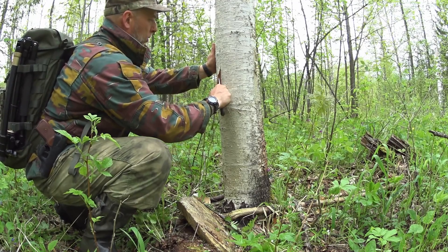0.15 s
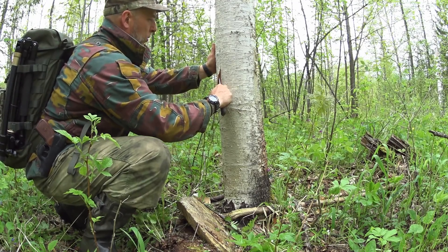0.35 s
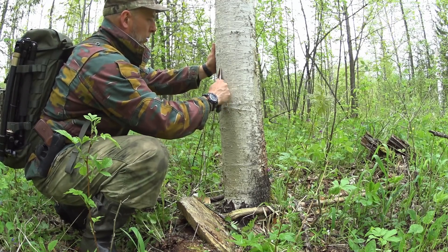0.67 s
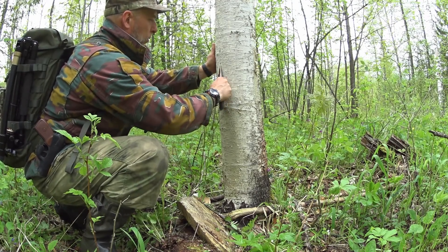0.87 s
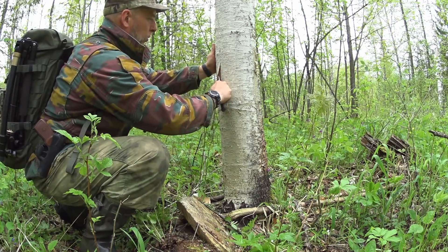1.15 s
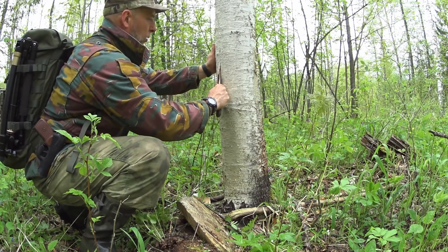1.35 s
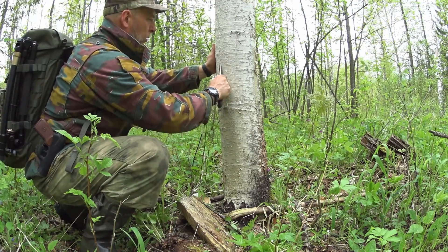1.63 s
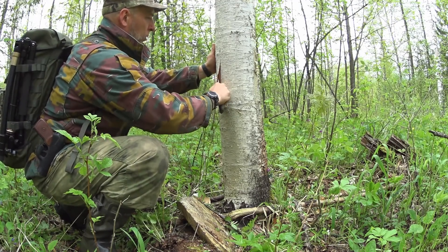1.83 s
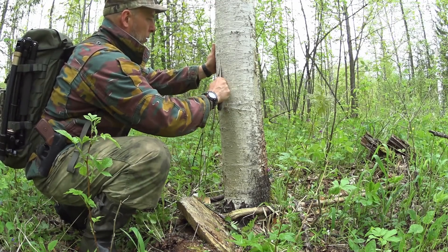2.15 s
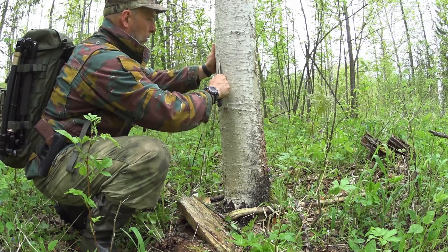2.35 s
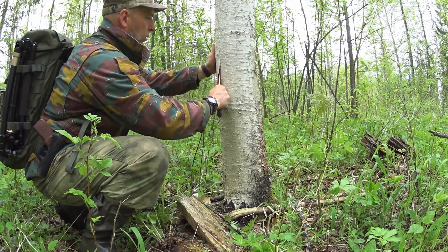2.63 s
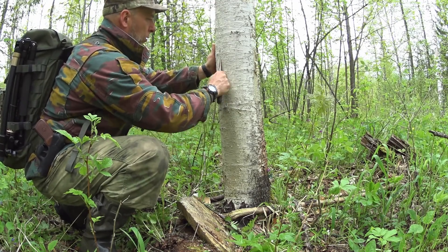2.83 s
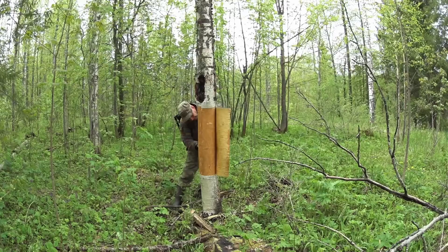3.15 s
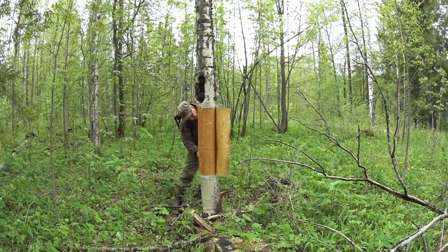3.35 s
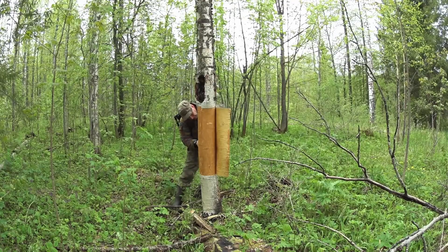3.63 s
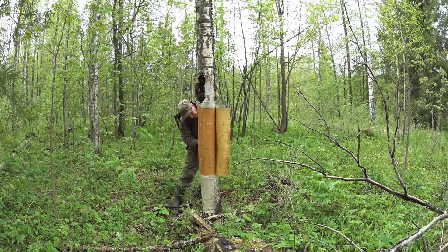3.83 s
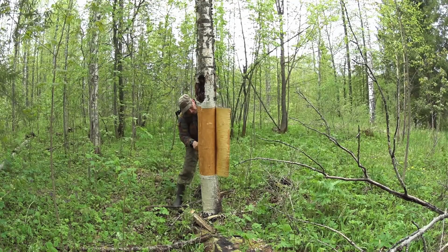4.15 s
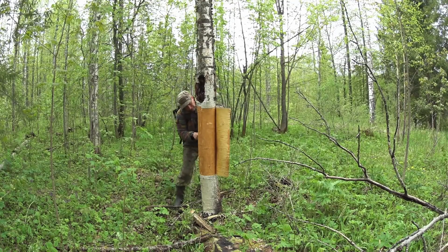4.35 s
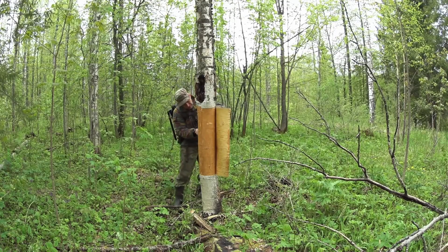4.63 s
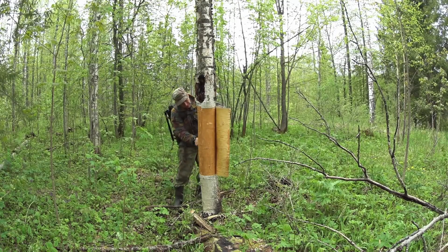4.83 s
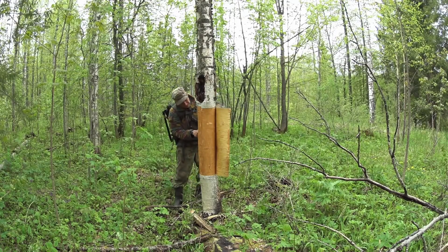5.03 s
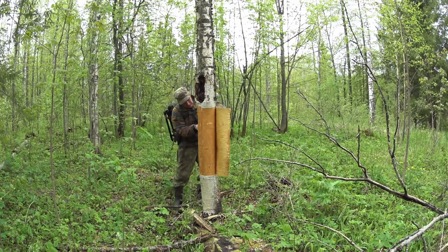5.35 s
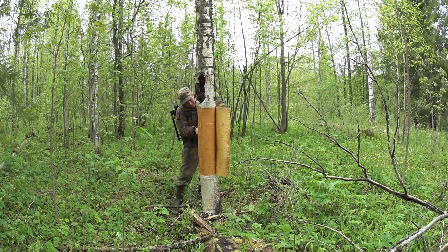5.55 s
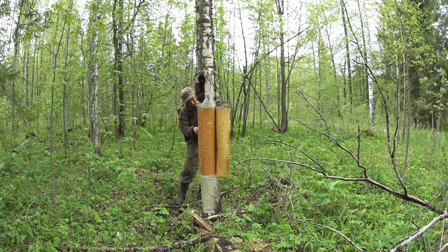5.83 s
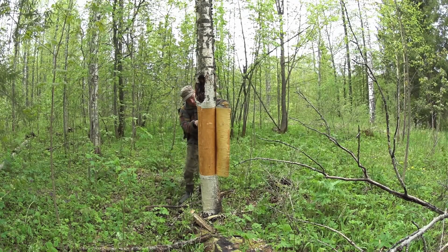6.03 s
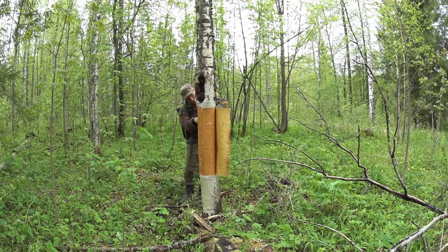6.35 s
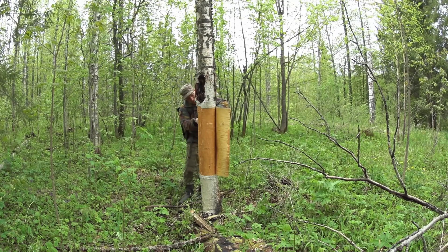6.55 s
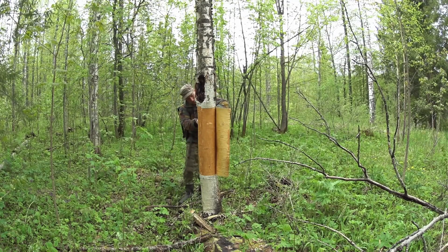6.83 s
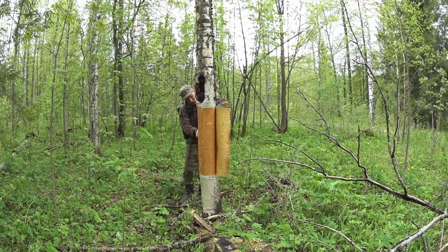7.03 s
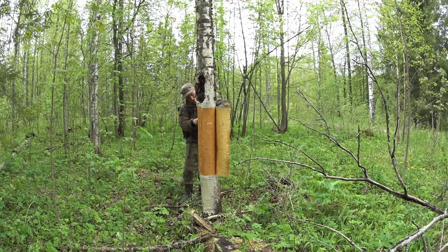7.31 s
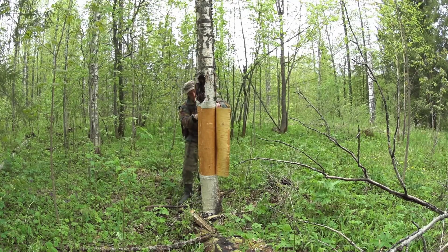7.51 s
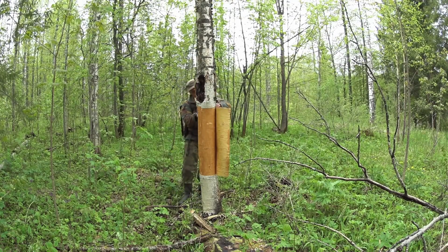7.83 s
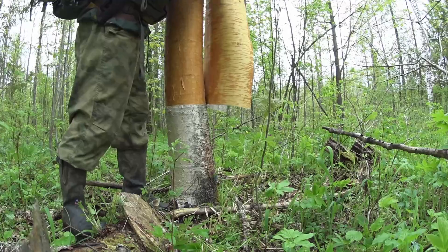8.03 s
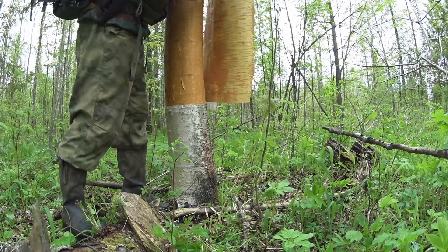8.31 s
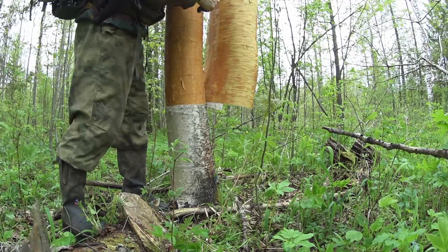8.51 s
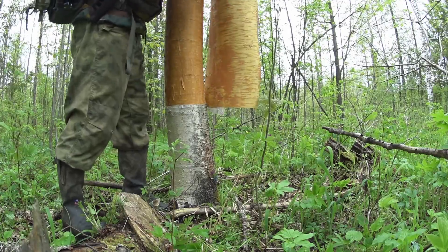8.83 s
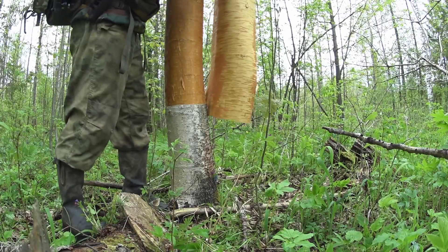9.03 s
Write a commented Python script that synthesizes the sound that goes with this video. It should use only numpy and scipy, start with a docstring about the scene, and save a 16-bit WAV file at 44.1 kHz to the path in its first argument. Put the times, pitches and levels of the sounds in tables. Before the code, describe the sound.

Short gritty cuts and dry snaps in tree bark, heard near then at a distance, end with peeling bark splitting and knocking hollowly outdoors.

```python
"""Cutting birch bark in the woods

A knife is pushed in short strokes through birch bark, first close by, then farther off among the trees.
Each stroke is a dense run of tiny random snaps, coloured by the rasp of the edge and the body of the bark.
At the end the loosened sheet peels, cracks and slaps back: splitting noise over decaying hollow modes.
Behind it: forest air and a distant road of shaped noise, and faint birds of gliding sine tones."""
import sys
import numpy as np
from scipy import signal
from scipy.fft import rfft, irfft, next_fast_len
from scipy.io import wavfile
from scipy.ndimage import uniform_filter1d

SR = 44100
rng = np.random.default_rng(int(sys.argv[2]) if len(sys.argv) > 2 else 0)


def wav_record(signal):
    """Record a signal, one row per channel, as 16-bit PCM in the file named by sys.argv[1]."""
    frames = np.transpose(np.atleast_2d(signal))
    bounded = np.clip(frames, -1, 1)
    # unit amplitude maps onto the largest positive 16-bit level
    quanta = np.round(bounded * 32767).astype(np.int16)
    wavfile.write(sys.argv[1], SR, quanta)


N = 404397
TIME = np.arange(N) / SR
FAR_FROM, SHEET_FROM = 3.227, 8.0  # s, start of the farther standpoint and of the one at the sheet
# Body of the bark close by. Each row: frequency in Hz, relative level in dB per Hz.
BODY_NEAR = [(150, -18), (350, -11.5), (700, -5), (1000, 2.5), (1350, 5), (1800, 4), (2400, 2.5), (3200, 0),
             (6000, -11.5)]


def pushes():
    """Rows of every push of the blade: the strokes, and the short bites where it breaks through."""
    # Passes along the cut. Each row: middle in seconds, length in seconds, relative level of the rasp in dB,
    # bark body in dB against the rasp.
    strokes = [(0.232, 0.044, -55, -25), (0.47, .14, -53.5, -19), (0.544, 0.0087, -46, -3.5),
               (0.577, 0.017, -51, -0.5), (0.72, 0.13, -48, -12.5), (1.036, .02, -47.5, 0.5),
               (1.088, 0.074, -39.5, -10), (1.378, 0.13, -48, -11), (1.558, .08, -44.5, -11.5),
               (1.801, 0.083, -33, -4), (2.055, 0.014, -42, -2), (2.1, 0.09, -47, -4),
               (2.216, 0.038, -46.5, -7.5), (2.263, 0.057, -42.5, -12), (2.441, 0.019, -40, -4),
               (2.508, 0.089, -33.5, -2.5), (2.674, 0.12, -44.5, -13), (2.897, 0.093, -44, -9.5),
               (3.137, 0.082, -33.5, -3.5), (3.418, 0.064, -37.5, -5), (3.952, 0.099, -40, -9.5),
               (4.837, 0.086, -36.5, -6.5), (5.128, 0.12, -50.5, 0), (5.672, 0.094, -36.5, -9),
               (6.615, 0.033, -53.5, -13), (7.025, 0.11, -40.5, -7), (7.342, 0.04, -53.5, 2),
               (7.415, 0.13, -56, -2.5)]
    # The blade breaks through in a hard stroke. Each row: middle in seconds, relative level of the rasp in dB,
    # bark body in dB against the rasp.
    bites = [(1.078, -29.5, -6.5), (1.394, -41.5, -4), (1.78, -23, -7.5), (2.112, -32, -3),
             (2.483, -24, -6.5), (2.693, -33, -3), (3.122, -20, -5), (3.437, -39.5, 7), (3.971, -36, 0.5),
             (4.862, -35, 3.5), (5.68, -32, 1), (7.056, -42.5, -2)]
    bite_s = 0.025
    return strokes + [(s, bite_s, db, body_db) for s, db, body_db in bites]


def close_strokes():
    """The knife close to the microphone: snaps of very uneven size."""
    # Rasp of the edge close by. Each row: frequency in Hz, relative level in dB per Hz.
    rasp_near = [(1200, -19.5), (2800, -26.5), (3250, -1.5), (3700, 5), (4700, 0.5), (5700, 0.5),
                 (7500, -4.5), (9500, -7), (11000, -10)]
    rows = [row for row in pushes() if row[0] < FAR_FROM]
    return scrape(rows, rasp_near, BODY_NEAR, per_s=8000, spread_db=4.5, judder_db=2.5,
                  ripple_db=1.8, travel_s=0.019)


def far_strokes():
    """The knife farther off among the trees: snaps of nearly even size."""
    # Rasp of the edge at a distance. Each row: frequency in Hz, relative level in dB per Hz.
    rasp_far = [(1200, 1.5), (2400, -13.5), (3300, 0), (4300, -3), (6400, -2.5), (8500, -6), (11000, -9.5)]
    # Body of the bark at a distance. Each row: frequency in Hz, relative level in dB per Hz.
    body_far = [(120, -37), (200, -30), (300, -1.5), (500, -16), (750, 4), (1000, 7), (1300, 2.5),
                (1650, -7), (2300, -1.5), (4000, -24)]
    rows = [row for row in pushes() if row[0] >= FAR_FROM]
    return scrape(rows, rasp_far, body_far, per_s=8000, spread_db=-0.5, judder_db=3.0,
                  ripple_db=2.6, travel_s=0.021)


def peeling():
    """The sheet peels from the wood in bursts of parting fibres."""
    # Each row: middle in seconds, length in seconds, relative level of the rasp in dB,
    # bark body in dB against the rasp.
    peels = [(8.076, 0.074, -43, 1), (8.142, 0.032, -51.5, 13.5), (8.57, 0.082, -66, 8.5),
             (8.92, 0.045, -55.5, 10.5), (9.04, 0.054, -46, 6.5), (9.1, 0.015, -33, -3.5),
             (9.144, 0.054, -28, -2.5)]
    # Rasp of the parting sheet. Each row: frequency in Hz, relative level in dB per Hz.
    rasp_sheet = [(1200, 14), (3000, -9), (4200, -3), (5200, 12.5), (8000, 11.5), (11000, 8)]
    # Body of the sheet. Each row: frequency in Hz, relative level in dB per Hz.
    body_sheet = [(70, -2), (200, -5.5), (450, 2), (700, -2), (1100, -0.5), (1700, -6.5), (2700, -4.5),
                  (5000, -20)]
    return scrape(peels, rasp_sheet, body_sheet, per_s=9000, spread_db=4.5, judder_db=2.5,
                  ripple_db=3.2, travel_s=0.022)


def scrape(rows, rasp, body, per_s, spread_db, judder_db, ripple_db, travel_s):
    """Fibres part under a swelling push that sticks and slips; the ring of the bark changes as the cut travels."""
    out = np.zeros(N)
    t = np.arange(-SR // 4, SR // 4) / SR
    for s, length, db, body_db in rows:
        judder = gain_of(judder_db * wander(len(t), 257.7))
        parting = swell(t, length) * fibres(len(t), per_s, spread_db) * judder
        # three spots take turns; the random part blends each into the next
        spot = np.floor(t / travel_s + rng.random(len(t))) % 3
        for k in range(3):
            # the rasp comes straight from the edge, the body of the bark answers half a millisecond later
            answer = np.roll(ring(body, ripple_db / 2), SR // 2000)
            bark = ring(rasp, ripple_db) + gain_of(body_db) * answer
            sound = gain_of(db) * colour(parting * (spot == k), bark)
            add(out, s + t[0], sound[t + s >= 0])
    return out


def swell(t, length):
    """A push around t = 0: it builds up exponentially, holds and lets go."""
    half_hold = 0.63 * length / 2
    attack_s, release_s = 0.28 * length, 0.15 * length
    build_up = np.minimum(t + half_hold, 0) / attack_s
    let_go = np.maximum(t - half_hold, 0) / release_s
    return np.exp(build_up - let_go)


def fibres(count, per_s, spread_db):
    """A random run of tiny snaps, rms 1; the larger spread_db, the more uneven their size."""
    chance, size, sign = rng.random((3, count))
    strength = gain_of(-spread_db * np.log(size + .02))
    return evened((chance < per_s / SR) * strength * np.sign(sign - .5))


def snaps():
    """Single flakes break with a bright tick, a brief splintering and a dull knock of the bark."""
    # The loudest flakes. Each row: start in seconds, peak in dB, dull knock in dB against the bright tick.
    flakes = [(1.3988, -24, 5), (1.95, -37.5, 25), (2.0866, -13.5, -6.5), (2.0964, -19.5, -8),
              (2.649, -25.5, 23), (2.685, -22.5, 12), (3.1095, -22, -14), (3.394, -19, -10),
              (4.223, -29.5, -16), (4.401, -38, -3), (4.593, -27, -3), (4.855, -26, 10), (5.14, -29.5, 20),
              (8.863, -34, -25), (9.109, -15.5, -12), (9.134, -6, -46), (9.142, -12.5, -37),
              (9.1522, -11, -15)]
    # Tick of a breaking flake. Each row: frequency in Hz, relative level in dB per Hz.
    tick_colour = [(250, 15), (1200, -1.5), (3000, -1.5), (5200, 6.5), (8000, 0), (11000, 5.5)]
    out = np.zeros(N)
    t = np.arange(1500) / SR
    for s, db, knock_db in flakes + stray_flakes():
        splinter_s = 0.0028 * 2 ** (knock_db / 39)  # duller flakes splinter longer
        burst = rng.standard_normal(len(t)) * np.exp(-t / splinter_s) * (1 - np.exp(-t / 0.0001))
        sound = colour(burst, ring(tick_colour, 1.2) + gain_of(knock_db) * ring(BODY_NEAR, 2.0))
        add(out, s, gain_of(db) * sound / abs(sound).max())
    return out


def stray_flakes(count=12):
    """Rows of faint snaps, scattered at random over the time the knife works."""
    rows = []
    for when, size, dull in rng.random((count, 3)):
        peak_db, knock_db = -46 + 9 * size, -18 + 34 * dull
        rows.append((when * SHEET_FROM, peak_db, knock_db))
    return rows


def cracks():
    """A quick run of splits frees the stiff sheet, which knocks with its own hollow modes."""
    # Modes of the loose sheet. Each row: nominal frequency in Hz, relative level in dB, t60 in seconds.
    sheet = [(175, -3, 0.1), (273, 0, 0.047), (350, 3.5, 0.093), (459, 3.5, 0.079), (584, -2.5, 0.076),
             (821, -5.5, 0.082), (970, -10, 0.011), (1430, -23.5, 0.6), (1620, -9, 0.035),
             (1980, -15, 0.025)]
    # Sharp splitting. Each row: frequency in Hz, relative level in dB per Hz.
    split_colour = [(200, -29), (700, -34), (950, -2), (1300, -1.5), (1730, 6), (1950, -6), (2250, 2),
                    (2650, -6), (3300, -3), (4300, -9.5), (4850, -7), (5800, -15), (8300, -10.5),
                    (11000, -20.5)]
    out = np.zeros(N)
    t = np.arange(SR // 5) / SR
    for s, db, sharp_db, length in rebounds():
        detune = 1 + 0.015 * rng.standard_normal(len(sheet))
        knock = np.zeros(len(t))
        for k, (hz, level, t60) in enumerate(sheet):
            mode = gain_of(level - 60 * t / t60) * np.sin(2 * np.pi * hz * detune[k] * t)
            knock += (-1) ** k * mode
        splitting = fibres(len(t), 9000, 3.7) * t / length * np.exp(-t / length)
        split = colour(splitting, ring(split_colour, 1.7, size=512))
        sound = knock / abs(knock).max() + gain_of(sharp_db) * split / abs(split).max()
        add(out, s, gain_of(db) * sound)
    return out


def rebounds(count=4):
    """Rows of every crack and its slaps back, each weaker and duller than the one before."""
    # The sheet gives way. Each row: start in seconds, peak of the hollow knock in dB,
    # sharp crack in dB against the knock, time constant of the split in seconds.
    first_cracks = [(8.052, -14.5, 8, 0.00097), (8.0684, -19, 12.5, .00055), (8.132, -35, -7, .0014),
                    (8.167, -36.5, 2.5, 0.00069), (8.403, -43.5, -1.5, .002), (8.881, -28.5, -22, 0.001),
                    (8.944, -38, 1, .002), (8.992, -34, 1, .0006)]
    gap_s, weaker_db, duller_db = .0078, -9, -10
    return [(s + k * gap_s, db + k * weaker_db, sharp_db + k * duller_db, length)
            for s, db, sharp_db, length in first_cracks for k in range(count)]


def bark_ring():
    """A cluster of close modes in the loosened bark, as a randomly modulated tone, beats and dies away."""
    # The bark rings on after some cuts. Each row: start in seconds, level in dB.
    rings = [(3.437, -45), (3.968, -32.5), (4.863, -46)]
    centre_hz, width_hz, t60_s = 1126, 260, 0.25
    out = np.zeros(N)
    t = np.arange(SR // 2) / SR
    for s, db in rings:
        modes = wander(len(t), width_hz) * np.sin(2 * np.pi * centre_hz * t)
        add(out, s, gain_of(db - 60 * t / t60_s) * modes)
    return out


def rustle(level_db):
    """Jacket and undergrowth brush with a fine, slightly clumped grain as the body shifts."""
    # Each row: middle in seconds, length in seconds, relative level in dB.
    rustles = [(4.328, 0.33, -47), (4.647, 0.17, -56), (5.353, 0.29, -53.5), (5.97, .55, -52.5),
               (6.041, 0.082, -47)]
    # Cloth and leaves. Each row: frequency in Hz, relative level in dB per Hz.
    cloth = [(90, 7), (200, 4), (500, 1), (1400, 0.5), (2500, -3.5), (6500, 0), (11000, -3)]
    level = sum(gain_of(db) * swell(TIME - s, length) for s, length, db in rustles)
    grain = fibres(N, per_s=4000, spread_db=2.0) * gain_of(2.1 * wander(N, per_s=90))
    return gain_of(level_db) * level * colour(grain, ring(cloth))


def birds(near_db=1, far_db=-71, glide=0.194, count=40):
    """A few clear whistles over a random scatter of far ones."""
    # The clearest whistles. Each row: start in seconds, length in seconds, relative level in dB,
    # start frequency in Hz, end frequency in Hz.
    whistles = [(0.068, 0.043, -58.5, 2430, 3450), (0.096, 0.038, -54.5, 3510, 2620),
                (0.208, .133, -59, 2560, 3860), (0.408, .105, -61, 2680, 3670),
                (0.865, 0.035, -60, 3630, 3870), (0.92, 0.05, -59.5, 3850, 4480),
                (1.213, .03, -62, 3200, 2900), (4.697, 0.134, -65, 3690, 3440),
                (6.25, .06, -67, 4500, 4330), (6.636, 0.065, -67, 3450, 3950),
                (6.725, .05, -67, 2520, 2520), (6.791, 0.062, -63, 2535, 2503),
                (6.795, .06, -62.5, 3440, 3960), (7.223, .05, -64.5, 3730, 3430),
                (7.267, 0.055, -62, 2100, 1800), (7.502, 0.041, -62, 3040, 2480)]
    out = np.zeros(N)
    for s, length, db, start_hz, end_hz in whistles:
        add(out, s, gain_of(db + near_db) * whistle(length, start_hz, end_hz))
    for when, length, pitch, bend in rng.random((count, 4)):
        start_hz = 2400 + 2200 * pitch
        end_hz = start_hz * (1 + glide * (bend - .5))
        add(out, when * N / SR, gain_of(far_db) * whistle(0.0475 + 0.072 * length, start_hz, end_hz))
    return out


def whistle(length, start_hz, end_hz):
    """A pure note: a straight fall or level tone, or a rise that scoops up a little and ends in a flick."""
    scoop_s, scoop_share, flick_s = 0.021, 0.27, .04
    t = np.arange(max(int(length * SR), 8)) / SR
    scoop = scoop_share * (1 - np.exp(-t / scoop_s))
    flick = (1 - scoop_share) * np.maximum(1 + (t - length) / flick_s, 0)
    course = scoop + flick if end_hz > start_hz else t / length
    hz = start_hz + (end_hz - start_hz) * course
    return signal.windows.tukey(len(t), .25) * np.sin(2 * np.pi * np.cumsum(hz) / SR)


def road(octaves=0.29, drone_hz=400, drone_db=-70):
    """Far tyres: a soft band of roar swells, fades and sinks in pitch as a vehicle passes, over a faint drone."""
    pass_s, near_for_s, nearest_db = 6.58, 0.6, -56
    pass_hz, sink_hz_per_s = 756, 68

    def roar_db(t, hz):
        centre_hz = np.maximum(pass_hz - sink_hz_per_s * (t - pass_s), 1)
        return -20 * np.log10(1 + (np.log2((hz + 1) / centre_hz) / octaves) ** 2)

    def engine_db(t, hz):
        return -20 * np.log10(1 + ((hz - drone_hz) / 14) ** 2)

    distance = np.hypot(1, (TIME - pass_s) / near_for_s)  # 1 when nearest
    roar = noise_pair(roar_db) * gain_of(nearest_db) / distance
    drone = noise_pair(engine_db) * gain_of(drone_db)
    heard = (TIME > FAR_FROM) & (TIME < SHEET_FROM)  # only from the farther standpoint
    return heard * (roar + drone)


def air():
    """Forest air: steady shaped noise with its own colour and level at each of the three standpoints."""
    # Air close to the knife. Each row: frequency in Hz, relative level in dB per Hz.
    air_near = [(12, -33), (20, -6.5), (58, 2.5), (108, -16.5), (184, -10.5), (320, -16.5), (488, -15.5),
                (557, -17.5), (1600, -20.5), (1780, -22), (3930, -24), (4980, -27.5), (8230, -30),
                (11000, -32), (14300, -60), (22000, -120)]
    # Air farther off. Each row: frequency in Hz, relative level in dB per Hz.
    air_far = [(12, -41), (20, -24), (59, 12), (79, -6), (114, -8), (346, -4.5), (395, -8), (451, -6),
               (806, -0.5), (1520, -7.5), (2440, -9.5), (3730, -11.5), (9900, -19.5), (11000, -20.5),
               (14300, -64), (22000, -120)]
    # Air at the loose sheet. Each row: frequency in Hz, relative level in dB per Hz.
    air_sheet = [(12, -44), (20, -0.5), (79, -5.5), (130, -4.5), (406, -4), (603, -7), (827, -5.5),
                 (1110, -10), (1200, -7), (1480, -3.5), (2260, -10), (6490, -14.5), (11000, -18.5),
                 (14300, -52), (22000, -120)]
    place = np.digitize(TIME, [FAR_FROM, SHEET_FROM])
    out = np.zeros((2, N))
    for k, (bed, db) in enumerate([(air_near, -53), (air_far, -56), (air_sheet, -56)]):
        out += (place == k) * gain_of(db) * noise_pair(lambda t, hz: read(bed, hz))
    return out


def noise_pair(field_db):
    """Two channels of noise from a dB field over (frames, bins); wide in the middle range, near mono in the bass."""
    # Likeness of the two channels. Each row: frequency in Hz, left-right correlation from -1 to 1.
    air_same = [(60, 0.99), (140, 0.83), (350, 0.12), (840, -0.33), (2020, -0.36), (4880, 0.2),
                (11800, 0.62)]
    patches_db = 1.5  # spread of the slow, broad unevenness
    hz = np.fft.rfftfreq(4096, 1 / SR)
    t = np.arange(N // 1024 + 5) * 1024 / SR
    a, b, c, d, patches = rng.standard_normal((5, len(t), len(hz)))
    patches = uniform_filter1d(patches, size=5, axis=0)
    patches = evened(uniform_filter1d(patches, size=30, axis=1))
    same = np.clip(read(air_same, hz), -1, 1)
    left = a + 1j * b
    right = same * left + np.sqrt(1 - same ** 2) * (c + 1j * d)
    z = np.array([left, right]) * gain_of(field_db(t[:, None], hz) + patches_db * patches)
    pair = signal.istft(z, nperseg=4096, noverlap=3072, time_axis=1, freq_axis=2)[1][:, :N]
    return pair / np.std(pair.mean(0))


def woods(x, scatter_db, scatter_s, tail_db, pan_db, side_db):
    """Direct sound, scatter and tail as the microphone pair hears them, left louder than right by pan_db."""
    # Tilt of the side signal. Each row: frequency in Hz, gain in dB.
    width = [(60, 4), (160, -10), (350, 0), (800, 3), (2000, -0.5), (4900, -4.5), (11000, -4.5)]
    mid = x + gain_of(scatter_db) * scatter(x, scatter_s) + gain_of(tail_db) * trees(x)
    diffuse = gain_of(side_db) * scatter(x, scatter_s) + gain_of(tail_db) * trees(x)
    size = next_fast_len(N + SR // 10)
    hz = np.fft.rfftfreq(size, 1 / SR)
    # in the middle range, the delay between the two ports puts the side signal a quarter turn from the mid
    turned = 1j * rfft(x, size) / (1 + (np.log2((hz + 1) / 700) / 0.39) ** 2)
    side = irfft((turned + rfft(diffuse, size)) * gain_of(read(width, hz)), size)[:N]
    return np.array([mid + side, mid - side]) * gain_of([[pan_db / 2], [-pan_db / 2]])


def scatter(x, decay_s, turns_per_s=7):
    """Quick reflections from trunk, arms and ground, cycling through three patterns as the work moves."""
    t = np.arange(SR // 20) / SR
    out = np.zeros(N)
    for k in range(3):
        taps = rng.standard_normal(len(t)) * np.exp(-t / decay_s) * (t > .001)
        share = np.sqrt(2 / 3) * np.cos(2 * np.pi * (turns_per_s * TIME + k / 3))
        out += colour(x * share, taps / np.linalg.norm(taps))
    return out


def trees(x):
    """A thin noise tail from the surrounding trunks; the highest treble dies first."""
    # Decay among the trunks. Each row: frequency in Hz, t60 in seconds.
    decay = [(200, 0.47), (1000, 0.22), (3500, 0.48), (7000, 0.21), (11000, 0.15)]
    t = np.arange(SR * 3 // 4) / SR
    hz, when, z = signal.stft(rng.standard_normal(len(t)), SR, nperseg=256)
    fading = z * gain_of(-60 * when / read(decay, hz)[:, None])
    tail = signal.istft(fading, SR, nperseg=256)[1][:len(t)]
    tail *= 1 - np.exp(-t / 0.0054)  # soft onset
    return colour(x, tail / np.linalg.norm(tail))


def gain_of(db):
    """Decibels to amplitude."""
    return 10 ** (np.asarray(db) / 20)


def evened(x):
    """Scales to rms 1."""
    return x / np.sqrt(np.mean(x ** 2) + 1e-20)


def read(points, hz):
    """Reads a table on a log-frequency axis."""
    f, value = np.transpose(points)
    return np.interp(np.log(hz + 1), np.log(f + 1), value)


def add(mix, s, sound):
    """Mixes a sound in at time s."""
    part = mix[max(round(s * SR), 0):][:len(sound)]
    part += sound[:len(part)]


def ring(points, ripple_db=0., size=1024):
    """Causal (minimum-phase) impulse response of energy 1 with this spectrum and random narrow resonances."""
    hz = np.fft.rfftfreq(size, 1 / SR)
    ripple = evened(uniform_filter1d(rng.standard_normal(len(hz)), size=4))
    low_cut = np.log((hz + 1) / (hz + points[0][0]))
    log_gain = np.log(gain_of(read(points, hz) + ripple_db * ripple)) + low_cut
    mirrored = np.r_[log_gain, log_gain[-2:0:-1]]
    spectrum = np.exp(np.conj(signal.hilbert(mirrored)))  # the log gain sets the phase
    response = np.fft.ifft(spectrum).real[:size // 2]
    return response / np.linalg.norm(response)


def colour(x, response):
    """Passes x through an impulse response."""
    return signal.oaconvolve(x, response)[:len(x)]


def wander(count, per_s):
    """A random curve: straight lines between normal random knots, per_s of them a second."""
    knots = rng.standard_normal(4096)
    return np.interp(np.arange(count) * per_s / SR, np.arange(len(knots)), knots)


def scene():
    """Close strokes, far strokes, then the sheet coming away, before birds, air and road."""
    close = gain_of(-0.5) * close_strokes()
    far = far_strokes() + bark_ring() + rustle(level_db=-0.5)
    sheet_and_flakes = gain_of(-1.5) * peeling() + snaps()
    mix = woods(close, scatter_db=-10.5, scatter_s=0.004, tail_db=-33, pan_db=0.6, side_db=-7.5)
    mix += woods(far, scatter_db=-5.0, scatter_s=0.0027, tail_db=-12.0, pan_db=1.2, side_db=-7)
    mix += woods(sheet_and_flakes, scatter_db=-20.5, scatter_s=0.0025, tail_db=-22.0, pan_db=0.7, side_db=-7.5)
    mix += woods(cracks(), scatter_db=-7.0, scatter_s=0.0079, tail_db=-23.5, pan_db=1.5, side_db=-8.0)
    mix += woods(birds(), scatter_db=-9, scatter_s=0.0066, tail_db=-7, pan_db=7, side_db=3.0)
    return mix + air() + road()


def record(dry):
    """Softens both ends, then cuts the treble above the band limit with a steep linear-phase filter."""
    edge_hz = 11150
    ends = signal.windows.tukey(N, .001)
    low_pass = signal.firwin(511, edge_hz, window=("kaiser", 9), fs=SR)
    return signal.oaconvolve(dry * ends, low_pass[None], "same")


dry = scene()
out = record(dry)
wav_record(out)
```